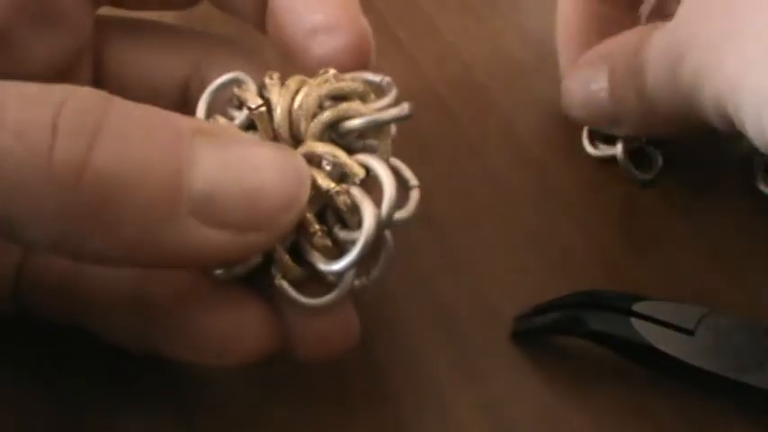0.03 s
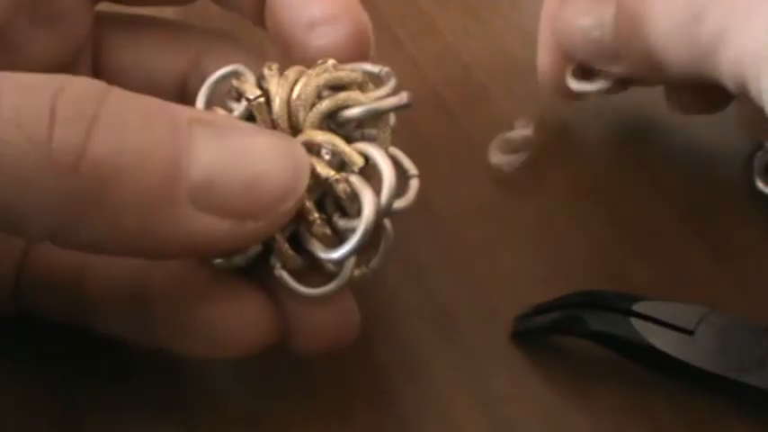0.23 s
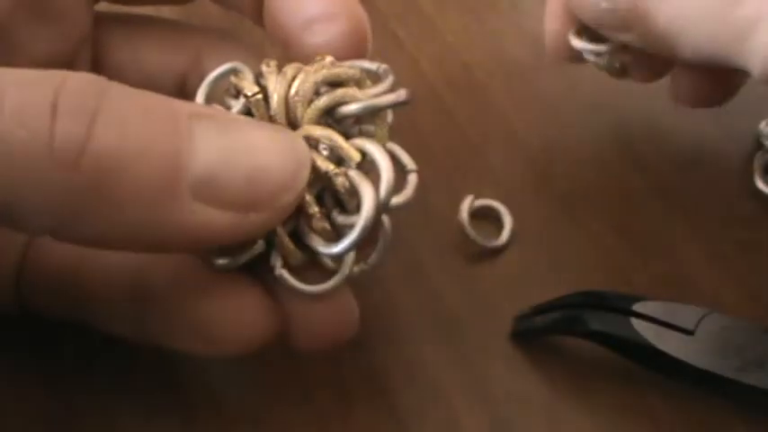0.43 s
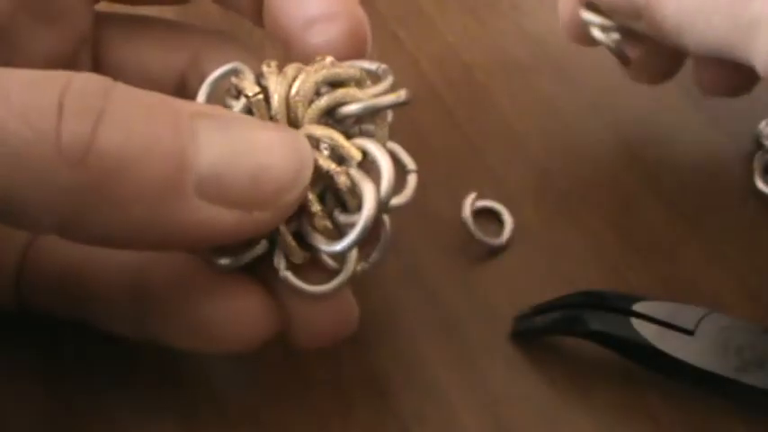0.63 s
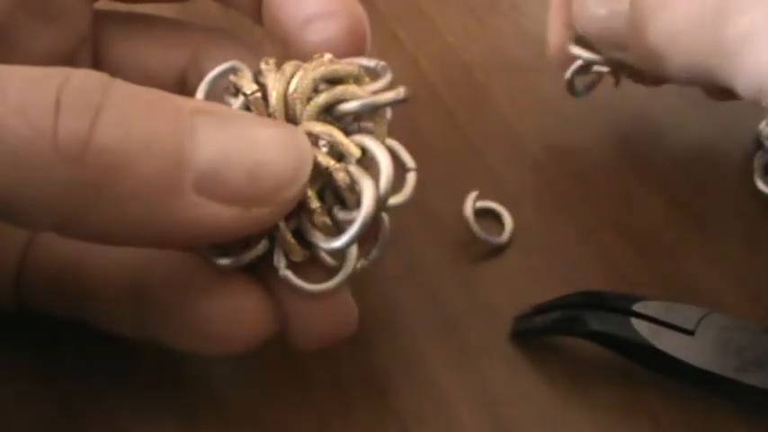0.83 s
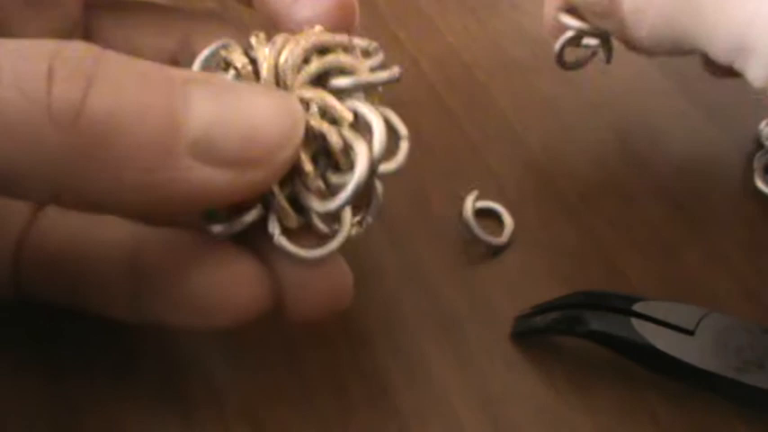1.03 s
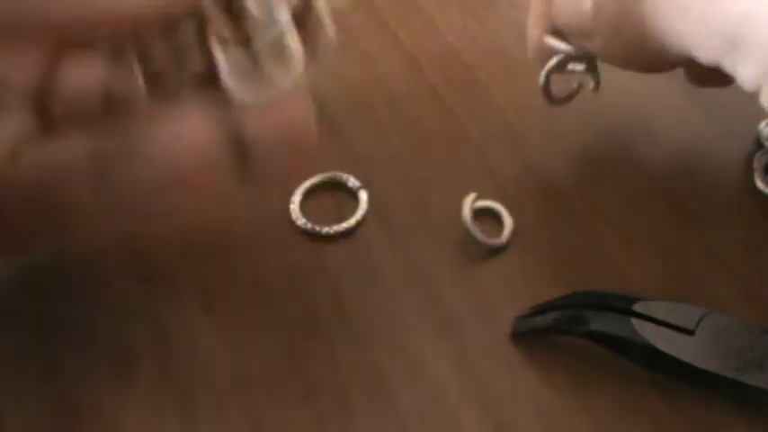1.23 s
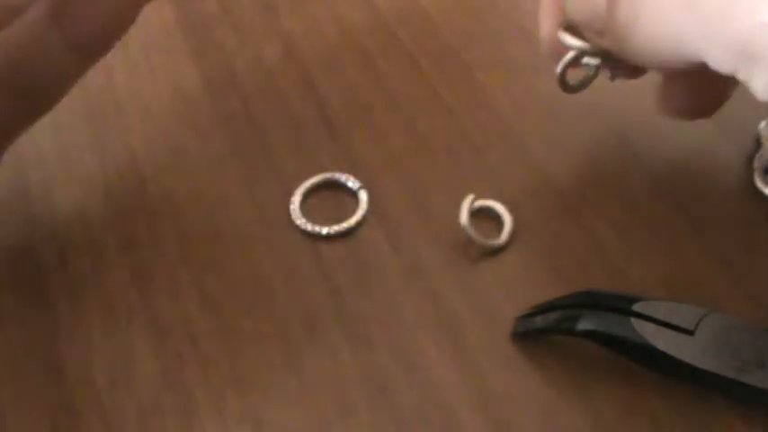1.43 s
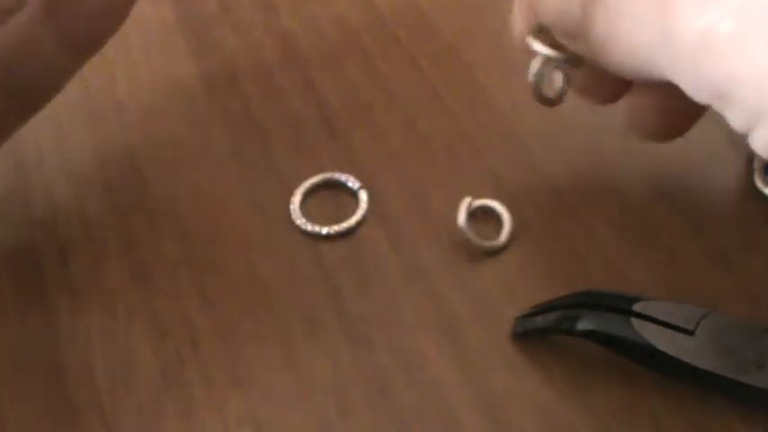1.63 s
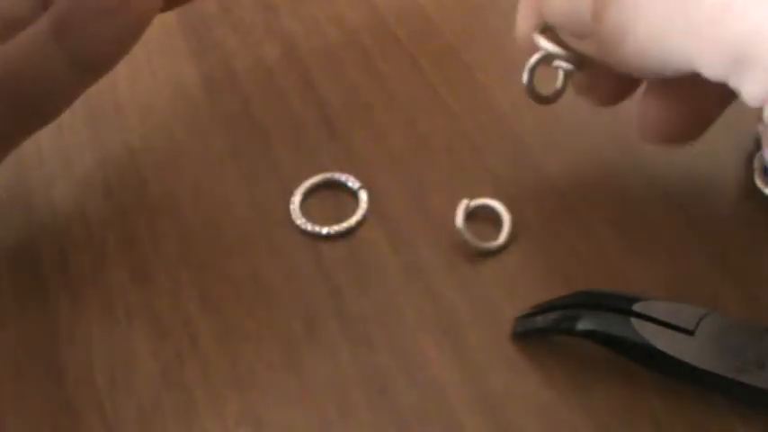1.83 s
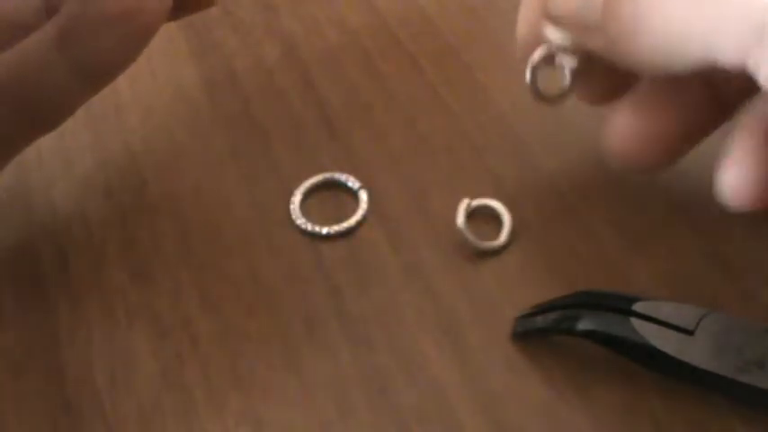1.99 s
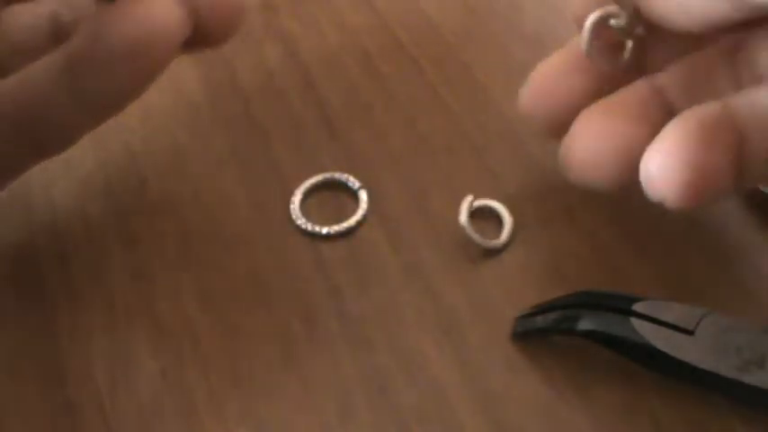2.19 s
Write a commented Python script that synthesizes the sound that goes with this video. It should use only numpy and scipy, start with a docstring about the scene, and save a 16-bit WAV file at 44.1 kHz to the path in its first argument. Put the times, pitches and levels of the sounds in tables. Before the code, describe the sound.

A small metal ring drops on a wooden table, bounces ever faster and settles.

```python
"""A small metal ring slips off its neighbours between the fingers and drops on a wooden table,
close to a stereo pair of microphones. It bounces ever faster and settles: each contact clicks on
the wood and restarts the ring's three modes, which sing on in flight. Afterwards the fingers turn
other rings with faint scuffs, clinks and taps on the table. The room is small and quiet, with a low hum."""
import sys
import numpy as np
from scipy import signal
from scipy.fft import rfft, irfft
from scipy.io import wavfile

SR = 44100
rng = np.random.default_rng(int(sys.argv[2]) if len(sys.argv) > 2 else 0)


def pcm_store(signal):
    """Save signal as 16-bit PCM."""
    levels = np.round(np.clip(np.atleast_2d(signal), -1, 1) * 32767)
    wavfile.write(sys.argv[1], SR, levels.astype(np.int16).T)


N = 103635

# The ring brushes its neighbours and slips free. Each row: start in seconds, click level in dB,
# then the levels of the ring's low, middle and top mode in dB.
SLIPS = [(0.1375, -22, -68, -65, -56), (.1490, -13.5, -54, -55, -49), (0.1673, -23, -45, -46.5, -54),
         (.1990, -16, -45.5, -41, -41)]
# The ring meets the table. Each row: start in seconds, click level in dB, wood level in dB relative
# to the click, then the levels of the ring's low, middle and top mode in dB.
BOUNCES = [(.2420, 3, 0.5, -50, -18.5, -19), (0.2638, -4.5, 3, -45, -28.5, -32),
           (0.2877, 3.5, -5, -49, -25, -45.5), (0.3076, -2.5, -5.5, -44, -28.5, -36),
           (0.3255, -2, 0.5, -37.5, -28.5, -30), (0.3473, -0.5, -7.5, -44, -38, -39),
           (.3575, -26, -2, -51, -33, -40), (.3715, -31, 23.5, -42, -32, -39),
           (.3799, -16, -5, -42.5, -37, -40), (0.3859, -10.5, 1.5, -45, -45, -39),
           (.3974, -9.5, -3, -50, -64, -40), (0.4054, -11, -0.5, -43, -36, -36),
           (0.414, -22.5, 1.5, -45, -51, -34), (.4214, -13, -5, -56, -47, -39),
           (.4248, -24.5, 9.5, -50.5, -43, -51), (0.432, -27, 4, -58.5, -54, -44),
           (0.436, -28, 3, -60, -45, -45), (.4400, -36, 2, -59, -55, -52.5)]
REST_S = 0.431   # the ring lies flat


def falling_ring():
    """The ring's modes sing from one contact to the next, which stops them and starts them afresh."""
    # The low, middle and top mode, each a frequency in Hz.
    mode_hz = [6722, 9318, 14900]
    # The same modes. Each row: T60 in flight in seconds, left minus right level in dB.
    mode_decay_and_pan = [(0.14, -3.5), (0.85, -3), (1, -1)]
    build_s, release_s = 0.001, 0.0039   # at a contact the new vibration builds and the old one dies
    split_hz, twin_db = 47, -12   # each mode has a weak twin just above it
    left_lag_s = .000007   # the sound reaches the right microphone first
    touches, t, out = SLIPS + BOUNCES, np.arange(N) / SR, np.zeros((2, N))
    ends = [row[0] for row in touches[1:]] + [REST_S]
    for row, end in zip(touches, ends):
        start, mode_db = row[0], row[-3:]
        span = slice(int(start * SR), int(end * SR) + SR // 20)
        age = t[span] - start - np.array([[left_lag_s], [0]])
        build = 1 - np.exp(-np.abs(age) / build_s)
        release = np.exp(-np.maximum(t[span] - end, 0) / release_s)
        for hz, (t60, pan_db), db in zip(mode_hz, mode_decay_and_pan, mode_db):
            phase, twin_phase = rng.random(2)
            tone = np.sin(2 * np.pi * (hz * age + phase))
            twin = from_db(twin_db) * np.sin(2 * np.pi * ((hz + split_hz) * age + twin_phase))
            envelope = from_db(db) * build * release * dying(age, t60)
            out[:, span] += panned(pan_db) * envelope * (tone + twin)
    return out


def contacts():
    """The ring ticks thinly against its metal neighbours, then clicks fully on the wood."""
    thin = signal.butter(2, 7050, "high", fs=SR, output="sos")
    on_metal = signal.sosfilt(thin, hard_click(impulses(*np.transpose(SLIPS)[:2])))
    on_wood = hard_click(impulses(*np.transpose(BOUNCES)[:2]) + rim_chatter())
    return on_metal + on_wood


def hard_click(hits):
    """Each touch is a sharp spike, thrown back at once by hands and tools nearby, new at every spot."""
    # The spectrum of a hard contact. Each row: frequency in Hz, gain in dB.
    click_spectrum = [(150, -38), (330, -8.5), (520, -17), (750, -7), (1500, -15), (2200, -10),
                      (2900, -4.5), (4300, 1), (5700, -5), (7500, 2.5), (9700, 3), (11800, 2),
                      (12700, -2.5), (15000, -12), (15600, -19)]
    spike = from_db(-2.8) * panned(-2) * hits
    energy_fade = dying(np.arange(N) / SR - .0003, t60=.006) ** 2
    scatter_envelope = np.sqrt(np.abs(convolve(hits ** 2, energy_fade / energy_fade.sum())))
    scatter = from_db(-3) * scatter_envelope * stereo_noise(alike=0.33)
    return coloured(spike + scatter, click_spectrum)


def rim_chatter(from_s=.35, per_s=400, level_db=-28, spread_db=3):
    """The rim skitters in small random touches until the ring lies flat."""
    t = np.arange(N) / SR
    touching = (rng.random(N) < per_s / SR) & (t > from_s) & (t < REST_S)
    return touching * from_db(level_db + spread_db * rng.standard_normal(N))


def table_top(spread_db=2.5, low_cut_hz=603):
    """Every bounce or tap knocks the wood's modes, a little differently from spot to spot."""
    # The modes of the table top. Each row: frequency in Hz, gain in dB, T60 in seconds.
    wood_modes = [(779, -40, 0.037), (940, -34, 0.014), (1400, -32, 0.016), (1724, -36.5, 0.03),
                  (2250, -42.5, 0.034), (2600, -30, 0.015), (3080, -25.5, 0.0086), (3287, -37, 0.028),
                  (4406, -29.5, 0.01), (5146, -31.5, 0.015)]
    # Tools and fingertips tap the table. Each row: start in seconds, strength in dB.
    taps = [(.570, -29.5), (0.585, -30), (.668, -27.5), (.742, -29.5), (.786, -28.5), (.904, -32.5),
            (.926, -35), (1.023, -28), (1.043, -36), (1.482, -36)]
    bounces = [(start, click_db + wood_db) for start, click_db, wood_db, *_ in BOUNCES]
    starts, knock_db = np.transpose(bounces + taps)
    spot_db = spread_db * rng.standard_normal((len(starts), len(wood_modes), 2))
    wood = np.zeros((2, N))
    for side in range(2):
        for k, (hz, mode_db, t60) in enumerate(wood_modes):
            knocks = impulses(starts, knock_db + mode_db + spot_db[:, k, side])
            wood[side] += (-1) ** k * resonate(knocks, hz, t60)
    return signal.sosfilt(signal.butter(4, low_cut_hz, "high", fs=SR, output="sos"), wood)


def table_thud():
    """The whole table gives a little under the bounces and sounds a faint low note."""
    return from_db(-46) * resonate(impulses(*np.transpose(BOUNCES)[:2]), hz=296, t60=0.028)


def finger_scuffs(grain_depth=0.46, size=8192):
    """Skin rubs on metal in short grainy bands of noise that swell and fade."""
    # Fingers scuff the rings. Each row: start in seconds, length in seconds, level in dB,
    # band centre in Hz, half-width in octaves.
    rubs = [(0.04, 0.008, -47, 5300, 4.5), (0.056, 0.032, -54.5, 4070, 1.4),
            (0.081, 0.017, -46.5, 3700, 1.34), (0.137, 0.014, -45.5, 11800, .45),
            (.180, 0.022, -50, 11900, 1.2), (0.615, .006, -53, 11000, 0.86),
            (0.748, 0.058, -59.5, 9500, 0.98), (0.984, .026, -55, 8440, 0.65),
            (1.0018, 0.0031, -41, 12900, .4), (1.038, 0.0056, -54.5, 6000, 0.76),
            (1.218, 0.063, -62.5, 8000, 0.86), (1.26, 0.032, -60.5, 7050, .6),
            (1.479, 0.0081, -58, 4000, 1.35), (1.558, 0.022, -53, 10700, 0.5),
            (1.601, 0.021, -54.5, 11000, .6), (2.233, .006, -61, 8000, 0.56)]
    out, hz = np.zeros((2, N + size)), np.linspace(1, SR / 2, size // 2 + 1)
    noise = stereo_noise(alike=0.66)
    grain = rms_one(np.exp(grain_depth * np.repeat(rng.standard_normal(N), 32)[:N]))
    friction = np.pad(noise * grain, ((0, 0), (0, size)))
    lead = size // 8   # samples of silence ahead of each rub
    for start, length, db, centre_hz, octaves in rubs:
        first = int(start * SR) - lead
        span = slice(first, first + size)
        progress = np.clip((np.arange(size) - lead) / (length * SR), 0, 1)
        swell = np.sqrt(np.abs(np.sin(np.pi * progress)))
        band = rms_one(1 / (1 + (np.log2(hz / centre_hz) / octaves) ** 4))
        out[:, span] += from_db(db) * irfft(rfft(friction[:, span] * swell) * band)
    return out[:, :N]


def held_rings():
    """Rings in the hand touch one another and clink briefly, damped by the fingers."""
    # The touches. Each row: start in seconds, strength in dB.
    clinks = [(.735, -54), (0.764, -47.5), (.834, -50), (1.0037, -57), (1.512, -48.5), (1.564, -46),
              (1.570, -37.5), (1.606, -51), (2.238, -54)]
    # The damped modes. Each row: frequency in Hz, gain in dB, T60 in seconds.
    held_modes = [(6770, -19, 0.066), (9080, -11, 0.14), (14900, -2, 0.046)]
    hits = impulses(*np.transpose(clinks))
    return sum(from_db(db) * resonate(hits, hz, t60) for hz, db, t60 in held_modes)


def room(knocks, singing):
    """The small room returns early and late reflections, then a faint, duller afterglow."""
    # The colour of the reflections. Each row: frequency in Hz, gain in dB.
    room_colour = [(200, -1), (1000, 3), (3000, 1), (8000, -3), (15000, 2)]
    early = from_db(-14.5) * echoes(knocks, t60=0.024, delay_s=0.0019, alike=1.0)
    late = echoes(from_db(-13) * knocks + from_db(-26) * singing, t60=0.31, delay_s=0.0084, alike=0.9)
    dull_knocks = signal.sosfilt(signal.butter(2, 3430, fs=SR, output="sos"), knocks)
    afterglow = from_db(-20) * echoes(dull_knocks, t60=1, delay_s=.02, alike=0.22)
    return coloured(early + late, room_colour) + afterglow


def room_tone():
    """Room air and microphone hiss, with the slightly wavering hum and whine of an appliance."""
    # The spectrum of air and hiss. Each row: frequency in Hz, relative level in dB.
    air_spectrum = [(15, -15), (25, -12), (53, -7.5), (71, -11.5), (91, -12), (274, -3.5), (322, -8.5),
                    (349, -5), (378, -2), (421, -11.5), (509, -8), (582, -10.5), (703, -11.5),
                    (1270, -18.5), (2420, -19), (3720, -23.5), (15500, -26)]
    # How alike that noise is at the two microphones. Each row: frequency in Hz, correlation.
    likeness = [(60, 0.97), (150, 0.86), (380, 0.82), (950, 0.077), (2380, 0.1), (5980, 0.47),
                (15000, 0.76)]
    # The appliance's tones. Each row: frequency in Hz, RMS level in dB.
    hum_tones = [(100, -70), (251, -69.5), (380, -70.5), (716, -74.5), (768, -75.5), (15625, -72.5)]
    hz, t = np.fft.rfftfreq(N, 1 / SR), np.arange(N) / SR
    noise = stereo_noise(at_hz(likeness, hz))
    air = rms_one(irfft(rfft(noise) * from_db(at_hz(air_spectrum, hz)), N))
    hum = np.zeros(N)
    for tone_hz, db in hum_tones:
        wander_rad = signal.resample(rng.standard_normal(16), N)
        hum += from_db(db) * np.sqrt(2) * np.sin(2 * np.pi * tone_hz * t + wander_rad)
    return from_db(-55) * air + hum


def from_db(db):
    return 10 ** (np.asarray(db) / 20)


def rms_one(x):
    return x / np.sqrt(np.mean(x ** 2) + 1e-20)


def at_hz(points, hz):
    """A spectrum's value, on a log-frequency axis."""
    point_hz, values = np.transpose(points)
    return np.interp(np.log(hz + 1), np.log(point_hz), values)


def panned(db):
    """Left and right gains, db being left minus right."""
    return from_db(np.array([[db], [-db]]) / 2)


def impulses(times, db):
    """One impulse for each contact."""
    out = np.zeros(N)
    out[np.round(np.asarray(times) * SR).astype(int)] = from_db(db)
    return out


def convolve(x, response):
    return signal.fftconvolve(np.atleast_2d(x), np.atleast_2d(response), axes=-1)[:, :N]


def coloured(x, spectrum, size=2048):
    """Causal (minimum-phase) filter with the given spectrum."""
    gain = from_db(at_hz(spectrum, np.linspace(0, SR / 2, size // 2 + 1)))
    cepstrum = irfft(np.log(gain))
    cepstrum[1:size // 2] *= 2
    cepstrum[size // 2 + 1:] = 0
    return convolve(x, irfft(np.exp(rfft(cepstrum))))


def resonate(x, hz, t60):
    """A unit impulse sets a sine of height 1 ringing."""
    radius, angle = from_db(-60 / (t60 * SR)), 2 * np.pi * hz / SR
    return signal.lfilter([0, np.sin(angle)], [1, -2 * radius * np.cos(angle), radius ** 2], x + 1e-18)


def dying(t, t60):
    """Exponential decay that starts at t = 0."""
    return (t >= 0) * np.exp(-np.log(1000) * np.maximum(t, 0) / t60)


def stereo_noise(alike):
    """White noise with the given left-right correlation (one value, or one per frequency)."""
    mid, side = rfft(rng.standard_normal((2, N)))
    alike = np.clip(alike, -.99, .99)
    return irfft(np.sqrt((1 + alike) / 2) * mid + np.sqrt((1 - alike) / 2) * side * [[1], [-1]], N)


def echoes(x, t60, delay_s, alike):
    """Dense reflections of unit energy that die away."""
    fade = dying(np.arange(N) / SR - delay_s, t60)
    return convolve(x, stereo_noise(alike) * fade / np.linalg.norm(fade))


def scene():
    """Knocks and ringing close to the microphones, with the small room behind them."""
    knocks = contacts() + table_top() + table_thud() + finger_scuffs()
    singing = falling_ring() + held_rings()
    return knocks + singing + room(knocks, singing) + room_tone()


def record(dry, cutoff_hz=15850):
    """The top of both microphone channels is cut steeply."""
    low_pass = signal.firwin(401, cutoff_hz, fs=SR, window=("kaiser", 7))
    return signal.fftconvolve(dry, low_pass[None], "same", axes=-1)


dry = scene()
out = record(dry)
pcm_store(out)
```